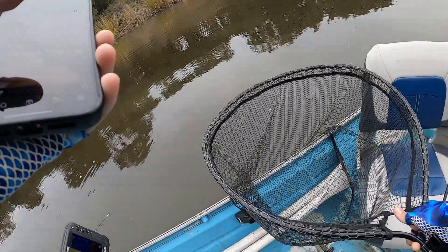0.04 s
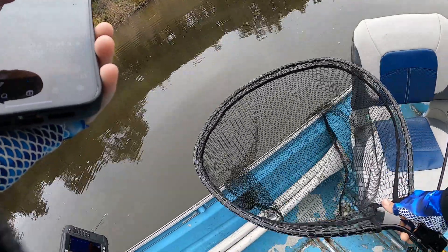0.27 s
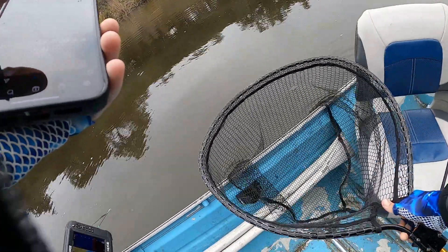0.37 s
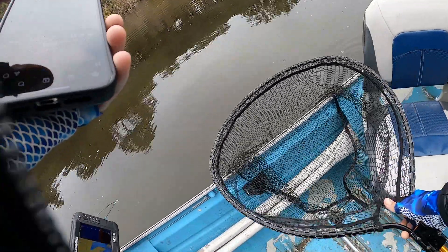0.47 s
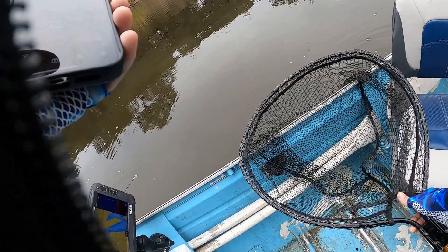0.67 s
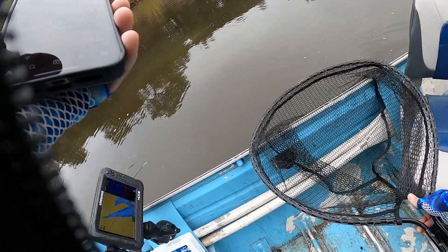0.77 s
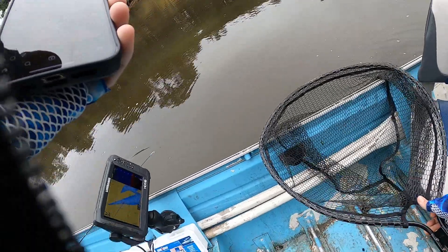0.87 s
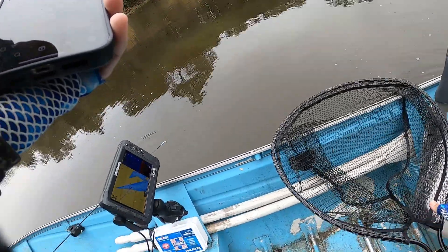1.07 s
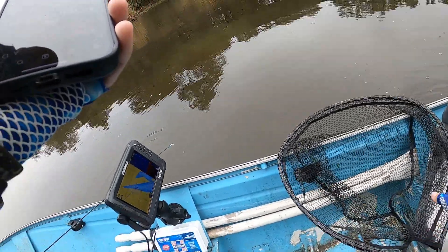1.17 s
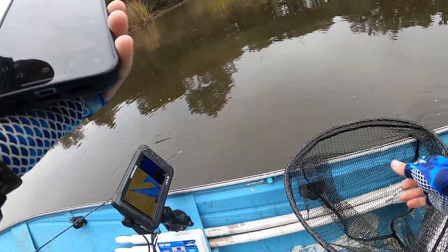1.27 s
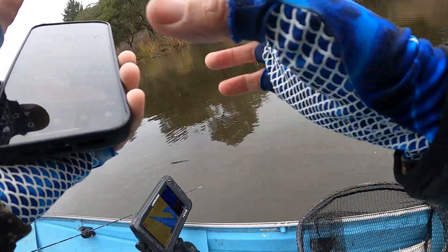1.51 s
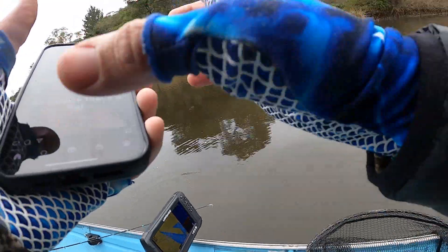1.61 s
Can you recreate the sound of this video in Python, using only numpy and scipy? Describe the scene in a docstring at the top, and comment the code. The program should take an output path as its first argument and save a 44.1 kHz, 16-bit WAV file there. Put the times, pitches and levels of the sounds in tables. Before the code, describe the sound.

A landing net bumps three times against an aluminium boat, clanking and thudding hollowly.

```python
"""A sleeve rustles close to the microphone as an arm shifts a landing net in a small aluminium boat.
Three knocks follow: the net's frame strikes the plating, which clacks and clangs while the hull booms.
Around them loose gear bounces, drags, squeaks faintly and rubs on the metal, so the hull murmurs.
The sleeve swells again at the end; calm water and air lie quietly behind it all. Mono."""
import sys
import numpy as np
from scipy import signal
from scipy.io import wavfile

SR = 44100
rng = np.random.default_rng(int(sys.argv[2]) if len(sys.argv) > 2 else 0)


def put_to_file(sound):
    """Save the sound as 16-bit audio at rate SR, in the file named by the first command-line argument."""
    columns = np.atleast_2d(sound).T  # one column per channel
    safe = np.clip(columns, -1, 1)
    whole_steps = np.round(safe * 32767)
    wavfile.write(sys.argv[1], SR, whole_steps.astype(np.int16))


N = 72765
TIME = np.arange(N) / SR

# low modes of the hull: f/Hz, t60/s, level/dB at the first, second and third spot struck
HULL_MODES = [(73.8, 1, -32.5, -40, -63.5), (101.9, 0.46, -19, -31.5, -33.5),
              (151.7, 0.42, -26.5, -34, -29), (206.8, 0.65, -21.5, -30.5, -41),
              (235.1, 0.52, -42, -28.5, -20), (264.3, 0.3, -10, -17.5, -16.5),
              (281.3, 0.18, -8, -10.5, -37), (306.4, 0.38, -10, -34, -27.5), (340, 0.27, -10, -18, -4.5),
              (378.6, 0.25, -19, -13.5, -20), (435.6, 0.23, -25, -27, -48), (531, 0.22, -22, -17, -38.5),
              (573.5, 0.21, -18.5, -22.5, -39), (654, 0.16, -55, -36.5, -38.5),
              (830.6, 0.21, -28, -27.5, -35)]
# ring time of the plating's dense upper modes: f/Hz, t60/s
PLATING_T60 = [(200, 0.12), (600, 0.19), (1000, 0.11), (1600, 0.071), (4000, 0.036), (12000, 0.013)]
TICK_T60_S, CLANG_RISE_S = 0.041, 0.00023


def from_db(db):
    """Decibels to gain."""
    return 10 ** (np.asarray(db) / 20)


def rms_one(x):
    """Scale to unit rms."""
    return x / np.sqrt(np.mean(x ** 2) + 1e-20)


def at_hz(points, hz):
    """Read a table on a log-frequency axis."""
    f, value = np.transpose(points)
    return np.interp(np.log(hz), np.log(f), value)


def level_curve(rows):
    """Gain over time from rows of t/s, level/dB."""
    return from_db(np.interp(TIME, *np.transpose(rows)))


def butter(x, hz, kind, order=2):
    """Causal Butterworth filter."""
    sos = signal.butter(order, np.clip(hz, 10, .45 * SR), kind, fs=SR, output="sos")
    return signal.sosfilt(sos, x + 1e-18)


def drift(rate_hz):
    """Random wander of unit rms."""
    return rms_one(butter(rng.standard_normal(2 * N), rate_hz, "low")[N:])


def delayed(x, s):
    """The sound x starting at time s."""
    return np.concatenate([np.zeros(max(int(s * SR), 0)), x])[:N]


def noise_bands(spectrum):
    """Third-octave noises with the given colour, together of unit rms, and their centres."""
    edges = 40 * 2 ** (np.arange(27) / 3)
    centres = np.sqrt(edges[1:] * edges[:-1])
    white = rng.standard_normal((2, N + SR // 10))
    bands = np.array([from_db(at_hz(spectrum, hz)) * butter(white[k % 2], edges[k:k + 2], "band")[-N:]
                      for k, hz in enumerate(centres)])
    return bands / bands.sum(0).std(), centres[:, None]


def sleeve():
    """Cloth rubs in fine grains close to the microphone, its brightness shifting as the arm moves."""
    # colour of the cloth: f/Hz, relative density/dB
    colour = [(40, -14), (60, 2), (90, -4.5), (130, -1.5), (300, 2), (600, 3), (1000, -0.5), (1700, -6.5),
              (2800, -4.5), (3700, -11), (4500, -12), (5300, -21.5), (6300, -12.5), (8300, -29.5),
              (11500, -26.5), (14000, -46.5)]
    # strength of the rustle: t/s, level/dB
    loudness = [(0, -39), (0.03, -37.5), (0.12, -41), (0.2, -40), (0.26, -54), (0.42, -50), (0.75, -48),
                (0.86, -55), (1.0, -57.5), (1.14, -54.5), (1.23, -47), (1.43, -46), (1.51, -40),
                (1.65, -38)]
    # brightness of the rustle: t/s, tilt about 1 kHz/(dB per octave)
    tilt = [(0, -1.2), (0.15, -0.2), (0.4, 1.43), (1.0, -1.4), (1.3, 0.3), (1.65, 0.72)]
    patchy_db, grain_db = 0.25, 1.62
    bands, centres = noise_bands(colour)
    octave_gain = level_curve(tilt)
    cloth = sum(band * from_db(patchy_db * drift(rate_hz=20)) * octave_gain ** np.log2(hz / 1000)
                for band, hz in zip(bands, centres))
    grains = rms_one(from_db(grain_db * drift(rate_hz=520)))
    return level_curve(loudness) * cloth * grains


def calm_water():
    """Water and air all around the boat make a faint, steady, dark noise."""
    # colour of the background: f/Hz, relative density/dB
    colour = [(40, 9), (90, -11), (270, 7), (500, -5.5), (1000, -3), (3000, -20), (7000, -36), (14000, -58)]
    bands, _ = noise_bands(colour)
    return from_db(-52) * bands.sum(0)


def ring(force, hz, t60):
    """One damped mode."""
    r, c = from_db(-60 / (t60 * SR)), np.cos(2 * np.pi * hz / SR)
    return signal.lfilter([1, -r * c], [1, -2 * r * c, r * r], force + 1e-18)


def hull(force, mode_db):
    """The hull's low modes ring under a force; deep bending waves travel slower and arrive last."""
    out = 0
    for (hz, t60, *_), db in zip(HULL_MODES, mode_db):
        travel_s = 0.0021 * np.sqrt(300 / hz)
        out += from_db(db) * delayed(ring(force, hz, t60), travel_s)
    return out


def push(s, contact_hz):
    """The force of one contact: a rounded click."""
    return butter(delayed(signal.unit_impulse(N), s), contact_hz, "low")


def clang(modes, s, db, tilt_db, t60, rise_s):
    """Dense metal modes ring out as decaying noise bands, tilted by tilt_db per octave."""
    bands, hz = modes
    size = N // 3
    start, t = rng.integers(size, N - size), TIME[:size]
    decay = from_db(db + tilt_db * np.log2(hz / 1500) - 60 * t / t60)
    attack = 1 - np.exp(-t / rise_s)
    burst = (bands[:, start:start + size] * decay).sum(0) * attack
    return delayed(np.pad(burst, (0, N - size)), s)


def loose_gear(plating):
    """Light gear drags in tiny slips and bounces on the hull, at the spot of the second knock."""
    # strength of the dragging: t/s, level/dB
    drag_level = [(0, -54), (0.48, -38), (0.53, -23.5), (0.58, -23), (0.625, -22.5), (0.68, -40),
                  (0.73, -25.5), (0.8, -24.5), (0.88, -68.5), (0.96, -35), (1.02, -50.5), (1.12, -44),
                  (1.2, -52), (1.65, -58)]
    # how strongly dragging stirs the hull's modes: f/Hz, relative level/dB
    drag_colour = [(100, -6), (200, 2.5), (240, 8.5), (280, -2.5), (360, 2.5), (550, 1.5)]
    # bounces and light bumps: t/s, boom/dB, clang/dB, clang tilt/(dB per octave)
    bumps = [(0.02, -29, -56, -4), (0.085, -36, -36.5, -1), (0.274, -14.5, -40.5, -9.5),
             (0.328, -12.5, -48.5, 6.5), (0.542, -13.5, -23.5, 0), (0.558, -28, -28, -3.5),
             (0.595, -27, -26, 0), (0.608, -18.5, -25, -1.5), (0.635, -11, -31.5, 0.5),
             (0.749, -14, -30, 3), (0.756, -12, -60, 12), (0.773, -18, -39, 7), (0.829, -31, -44, -1),
             (0.924, -61, -42, 0.5), (0.967, -31, -48, 1), (1.033, -26.5, -48, -4),
             (1.086, -32, -44.5, -3.5), (1.135, -31, -54, -2)]
    slips_per_s, grit_db, contact_hz, scatter_db = 460, -21, 580, 0.5
    mode_hz, _, _, spot_db, _ = np.transpose(HULL_MODES)
    slips = (rng.random(N) < slips_per_s / SR) * rng.choice([-1, 1], N)
    slips = slips * from_db(np.minimum(rng.exponential(1, N), 3))  # uneven by up to 3 dB
    tick = clang(plating, 0, 0, 0, TICK_T60_S, CLANG_RISE_S)
    grit = rms_one(signal.fftconvolve(slips, tick)[:N])
    murmur = rms_one(hull(butter(slips, contact_hz, "low"), spot_db + at_hz(drag_colour, mode_hz)))
    out = level_curve(drag_level) * (murmur + from_db(grit_db) * grit)
    t60 = at_hz(PLATING_T60, plating[1])
    for s, boom_db, clang_db, tilt_db in bumps:
        force = butter(push(s, contact_hz), 190, "high", order=1)  # too light for much deep boom
        out += hull(force, spot_db + boom_db + scatter_db * rng.standard_normal(len(HULL_MODES)))
        out += clang(plating, s, clang_db, tilt_db, t60, rise_s=0.0026)
    return out


def stroke(s, length, fade_s=0.012):
    """Fade in, hold, fade out."""
    return np.clip(np.minimum(TIME - s, s + length - TIME) / fade_s, 0, 1)


def squeaks():
    """Friction of gear on metal locks into thin, unsteady tones that weaken as they go."""
    # squeaking slides: t/s, length/s, f/Hz, pitch wander/Hz, starting level/dB
    slides = [(0.062, 0.126, 682, 10, -35.5), (0.754, 0.075, 3855, 80, -50)]
    wander_rate_hz, flicker_db, decay_db_per_s = 80, 3.5, 52
    out = 0
    for s, length, hz, wander_hz, db in slides:
        phase = 2 * np.pi * np.cumsum(hz + wander_hz * drift(wander_rate_hz)) / SR
        gain = from_db(db - decay_db_per_s * np.clip(TIME - s, 0, length)) * stroke(s, length)
        flicker = from_db(flicker_db * drift(wander_rate_hz))
        out += gain * rms_one(np.sin(phase) * flicker)
    return out


def clack(s, db):
    """The frame's hard contact rings a few strong upper modes of the plating."""
    # modes of the clack: f/Hz, t60/s, relative level/dB
    modes = [(896, 0.19, -11.5), (1090, 0.072, -15), (1182, .12, -10), (1470, 0.031, -14),
             (1590, 0.03, -2.5), (1850, 0.097, -14.5), (2060, 0.088, -20.5), (2510, 0.054, -12.5),
             (3954, 0.063, -16.5)]
    click = delayed(signal.unit_impulse(N), s)
    ringing = sum((-1) ** k * from_db(db + mode_db) * ring(click, hz, t60)
                  for k, (hz, t60, mode_db) in enumerate(modes))
    return butter(ringing, 4000, "low")


def knocks(plating):
    """The net's frame hits three spots: a tick, the plating's clang and clack, then the hull's boom."""
    # one blow per spot: t/s, boom/dB, wash/dB, wash low cut/Hz, clang/dB,
    # clang tilt/(dB per octave), clack/dB, tick/dB, contact low-pass/Hz
    blows = [(0.2207, -1.5, -14, 60, -13.5, 0, -14, -14.5, 925),
             (0.4854, 1, -22, 140, -17, 0.5, -17, -22.5, 890),
             (0.737, -2, -17, 205, -25, -4.5, -36.5, -48, 590)]
    # the wash, a crowd of weaker hull modes that swells after a blow: f/Hz, relative density/dB
    wash_colour = [(60, -37), (120, -9.5), (170, -20.5), (250, 5), (380, -0.5), (550, -26), (900, -41),
                   (2000, -52), (14000, -88.5)]
    tick_lead_s = 0.0051  # the frame touches just before the blow
    t60 = at_hz(PLATING_T60, plating[1])
    spots = np.transpose(HULL_MODES)[2:]
    weak_modes = noise_bands(wash_colour)
    out = 0
    for blow, spot_db in zip(blows, spots):
        s, boom_db, wash_db, wash_cut_hz, clang_db, tilt_db, clack_db, tick_db, contact_hz = blow
        out += clang(plating, s - tick_lead_s, tick_db, tilt_db=-1, t60=TICK_T60_S, rise_s=CLANG_RISE_S)
        out += clang(plating, s, clang_db, tilt_db, t60, CLANG_RISE_S) + clack(s, clack_db)
        out += hull(push(s, contact_hz), spot_db + boom_db)
        wash = clang(weak_modes, s, wash_db, tilt_db=0, t60=0.44, rise_s=0.0032)
        out += butter(wash, wash_cut_hz, "high")
    return out


def rubs():
    """Short, rough rubs of gear and glove each excite one narrow resonance."""
    # rubbing slides: t/s, length/s, f/Hz, width/Hz, level/dB
    slides = [(0.571, 0.145, 4150, 600, -55), (1.205, 0.02, 3000, 1000, -47), (1.256, 0.04, 556, 220, -41),
              (1.493, 0.027, 2790, 450, -38), (1.552, 0.032, 2820, 450, -39.5),
              (1.616, 0.045, 2830, 497, -45.5)]
    out = 0
    for s, length, hz, width_hz, db in slides:
        rasp = butter(rng.standard_normal(N), [hz - width_hz / 2, hz + width_hz / 2], "band")
        out += from_db(db) * stroke(s, length) * rms_one(rasp)
    return out


def scene():
    """Sleeve, water, gear and knocks as heard from inside the boat, in mono."""
    # dense upper modes of the aluminium plating: f/Hz, relative density/dB
    plating_colour = [(200, -15), (500, 8.5), (740, -4.5), (900, -1.5), (1150, -1.5), (1380, -9.5),
                      (1650, -0.5), (2100, -7.5), (3000, -13), (4500, -10), (6200, -17), (8000, -39.5),
                      (10500, -7), (12000, -39), (14000, -50)]
    plating = noise_bands(plating_colour)
    return (sleeve() + calm_water() + loose_gear(plating) + squeaks() + knocks(plating) + rubs())[None]


def record(dry):
    """The microphone drops the deep bass, colours the treble, rounds the peaks and cuts the top."""
    # resonances and dips of the microphone housing: f/Hz, width/Hz, gain/dB
    housing = [(4460, 510, 0.5), (5050, 660, -5), (6000, 790, 1.5), (8140, 1060, -4)]
    low_cut_hz, rolloff_hz, cutoff_hz = 75, 12200, 14800
    x = butter(dry, low_cut_hz, "high", order=4)
    x = butter(x, rolloff_hz, "low", order=4)
    for hz, width_hz, db in housing:
        x = x + (from_db(db) - 1) * butter(x, [hz - width_hz / 2, hz + width_hz / 2], "band", order=1)
    x = x / (1 + x ** 6) ** (1 / 6)  # soft clipping
    return signal.sosfilt(signal.cheby2(12, 70, cutoff_hz, fs=SR, output="sos"), x)


dry = scene()
out = record(dry)
put_to_file(out)
```